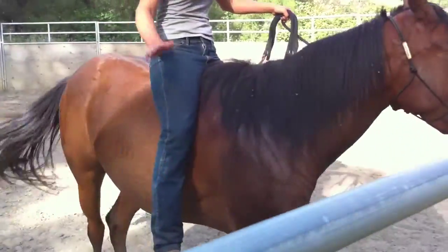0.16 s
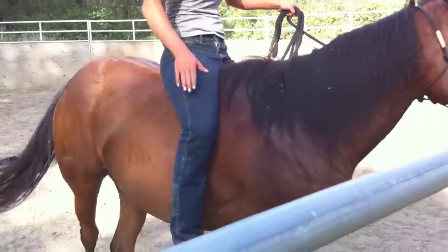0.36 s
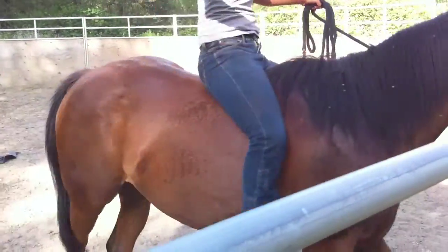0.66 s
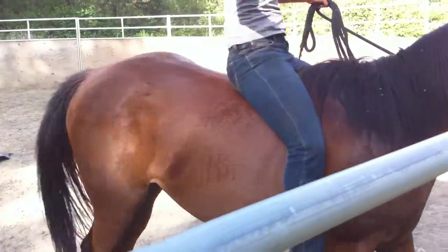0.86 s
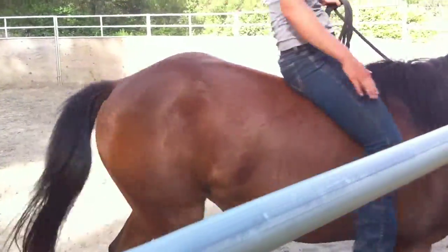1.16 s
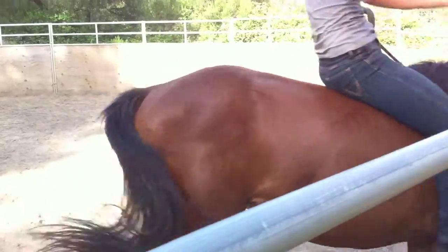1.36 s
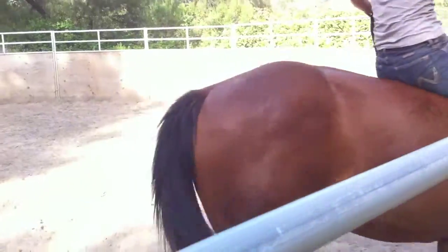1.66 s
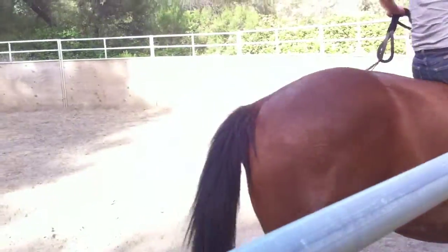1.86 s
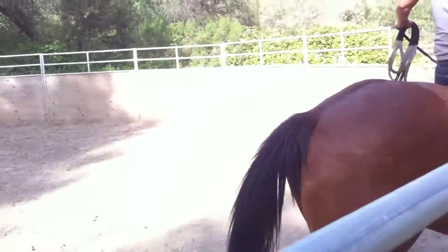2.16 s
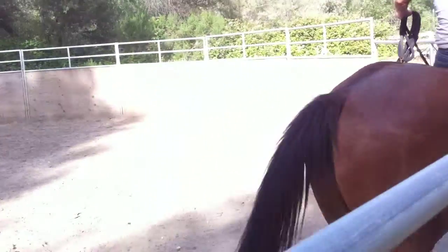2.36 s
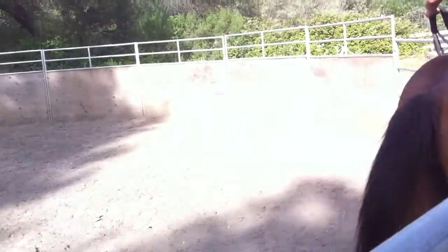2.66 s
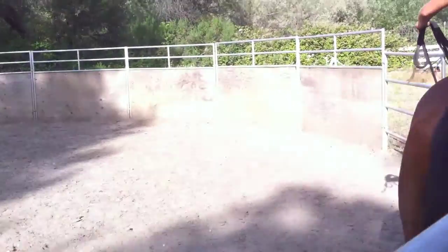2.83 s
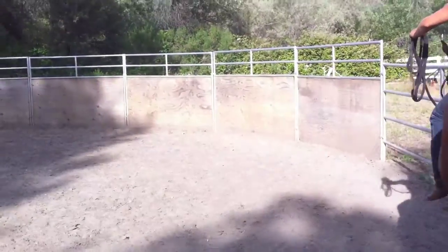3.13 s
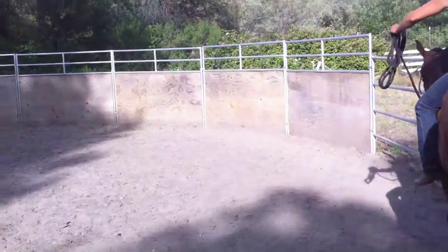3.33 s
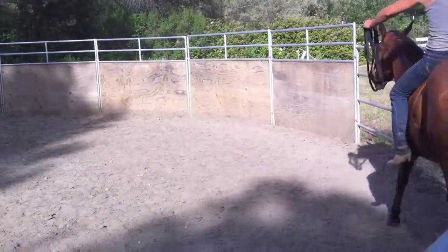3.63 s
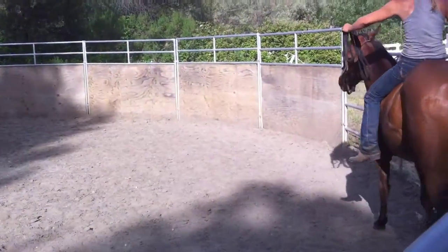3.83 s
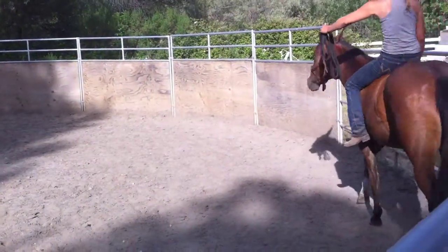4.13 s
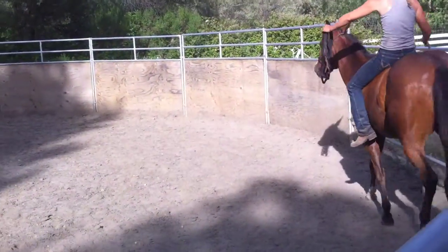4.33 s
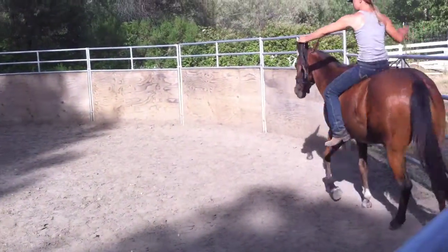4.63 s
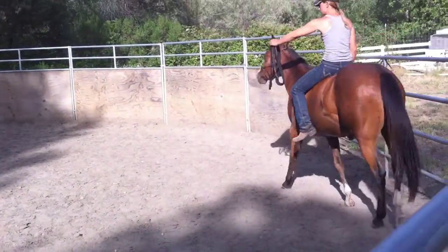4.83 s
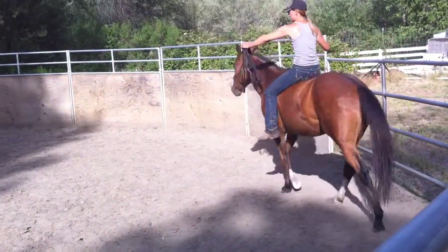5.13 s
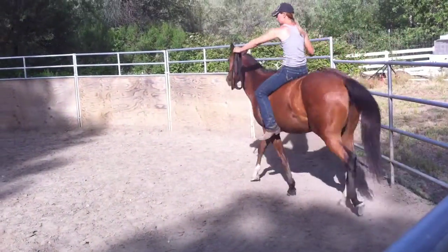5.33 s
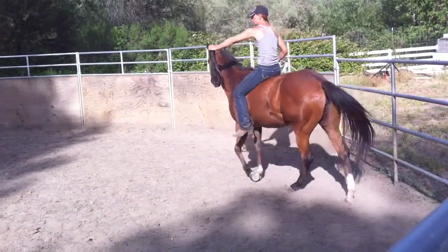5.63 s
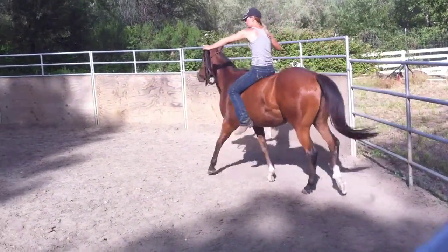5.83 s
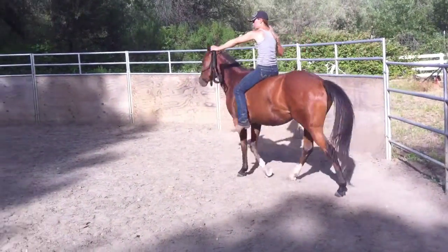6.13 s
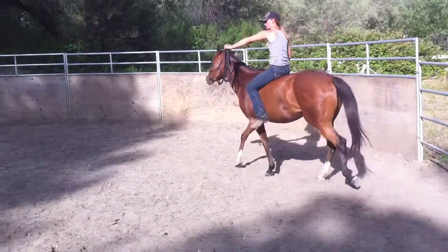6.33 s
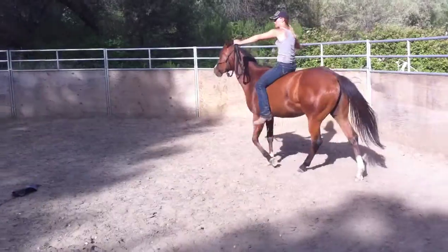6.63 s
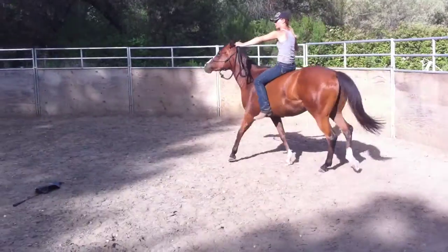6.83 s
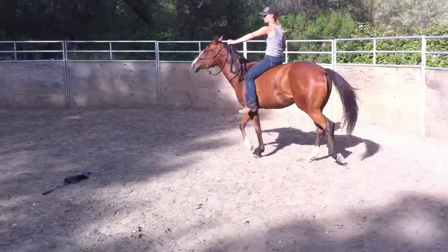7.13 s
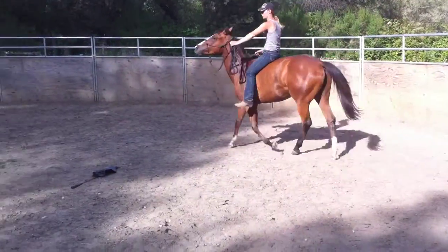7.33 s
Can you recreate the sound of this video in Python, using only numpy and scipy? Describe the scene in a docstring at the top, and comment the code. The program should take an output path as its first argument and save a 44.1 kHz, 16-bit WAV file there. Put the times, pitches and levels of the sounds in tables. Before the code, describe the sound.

Sharp hand slaps on denim and a horse's hide sound close by, mixed at first with quiet tongue clicks. They repeat steadily, ten in all, getting softer as the horse moves off across an open-air pen. Between them come dull hoof steps, crunching sand, ticks of grit and swishes of tail and cloth. Faint bird whistles and a low, throbbing far engine sit behind in a soft wash of air.

```python
"""Open-hand slaps on thigh and hide, with small tongue clicks, as a bareback rider urges a horse away
round a sandy pen. Each slap is a thump of flesh, a ring of trapped air and a crack of cloth.
Between the slaps the hooves thud and scuff in the sand, tail and denim swish and bits of grit tick.
Birds whistle faintly in the bushes, and a far engine drones and throbs, slowly growing."""
import sys
import numpy as np
from scipy import signal
from scipy.fft import rfft, irfft
from scipy.io import wavfile

SR = 44100
rng = np.random.default_rng(int(sys.argv[2]) if len(sys.argv) > 2 else 0)


def to_wav(sig):
    """Store sig (one row per channel, or 1-D mono) as 16-bit WAV at the path in sys.argv[1].

    Samples outside -1..1 are clipped; the rate is SR.
    """
    pcm = np.clip(np.atleast_2d(sig), -1, 1) * 32767
    pcm = np.round(pcm).astype(np.int16)
    wavfile.write(sys.argv[1], SR, pcm.T)  # frames by channels


N = 330309
TIME = np.arange(N) / SR
AGE = np.arange(int(.08 * SR)) / SR  # seconds into a one-shot

# open-hand slaps: t/s, thump/dB, clap/dB, crack/dB, flesh/Hz, palm pocket/Hz, its width/Hz,
# finger pocket/Hz, its share/dB, rub of the sliding hand/dB
SLAPS = [(0.366, -35, -20, -27, 397, 2180, 900, 4430, -2.5, -52),
         (1.1771, -31.5, -18.5, -33.5, 447, 1920, 800, 3350, -1.5, -53),
         (2.0214, -37, -17, -30, 315, 2410, 400, 1700, -10, -50.5),
         (2.9, -34.5, -29, -32.5, 294, 920, 830, 2660, 0.5, -50.5),
         (3.5942, -40, -29, -43.5, 326, 1390, 695, 1650, -7, -57),
         (4.2703, -39, -35.5, -45, 480, 1780, 845, 2330, -36, -54.5),
         (4.974, -52.5, -34, -43, 477, 2160, 1670, 1510, -14, -49.5),
         (5.6382, -42, -41, -65, 378, 790, 590, 1400, -7.5, -59.5),
         (6.441, -53, -42, -52.5, 417, 2220, 1300, 2900, -4.5, -61),
         (7.176, -49, -40, -58.5, 374, 1400, 910, 760, -1, -56.5)]
# hiss spectrum of hair and cloth: f/Hz, level/dB
HISS = [(2500, -75), (4500, -6.5), (7000, -0.5), (10000, -2.5), (15500, -5)]


def from_db(db):
    return 10 ** (np.asarray(db) / 20)


def rms_one(x):
    return x / np.sqrt(np.mean(x ** 2) + 1e-20)


def curve(points, s=TIME):
    """Read a breakpoint curve at the given times."""
    return np.interp(s, *np.transpose(points))


def add(track, s, sound):
    """Mix a sound in, starting at a time."""
    at = max(int(s * SR), 0)
    track[at:at + len(sound)] += sound[:N - at]


def band(x, low_hz, high_hz, order=2):
    sos = signal.butter(order, [low_hz, min(high_hz, .45 * SR)], "band", fs=SR, output="sos")
    return signal.sosfilt(sos, x)


def resonance(x, hz, width_hz):
    r = np.exp(-np.pi * width_hz / SR)
    feedback = [1, -2 * r * np.cos(2 * np.pi * hz / SR), r * r]
    return signal.lfilter(np.array([1, 0, -1]) * (1 - r * r) / 2, feedback, x)


def drift(per_s):
    """A random modulator gliding from value to value; rms 1."""
    return rms_one(np.interp(TIME * per_s, np.arange(N), rng.standard_normal(N)))


def coloured(x, spectrum):
    """EQ a steady noise to a spectrum, rolling off past its ends; rms 1."""
    hz, level_db = np.transpose(spectrum)
    log_hz = np.log(np.maximum(np.arange(N // 2 + 1) * SR / N, 1))
    gain = from_db(np.interp(log_hz, np.log(hz), level_db))
    skirts = np.exp(-2 * np.abs(log_hz - np.clip(log_hz, np.log(hz[0]), np.log(hz[-1]))))
    return rms_one(irfft(rfft(x) * gain * skirts, N))


def grains(per_s, spread_db):
    """Random clicks of uneven size; rms 1."""
    sizes = from_db(spread_db * np.minimum(rng.exponential(1, N), 4))
    return rms_one(sizes * rng.standard_normal(N) * (rng.random(N) < per_s / SR))


def at_level(x, level_db):
    """Scale a one-shot to a level, taken as if its energy lay within 10 ms."""
    return from_db(level_db) * x / np.sqrt(np.sum(x ** 2) / (.01 * SR) + 1e-20)


def burst(rise_s, decay_s):
    """Noise that swells and dies; energy 1."""
    x = rng.standard_normal(len(AGE)) * (1 - np.exp(-AGE / rise_s)) * np.exp(-AGE / decay_s)
    return x / np.linalg.norm(x)


def distance(s):
    """Metres from the listener to the horse."""
    # the horse walks away: t/s, distance/m
    path = [(0, 1.86), (2, 2.06), (4, 3.7), (7.49, 6.1)]
    return curve(path, s)


def air():
    """A bed of open air: the even wash of leaves and distance."""
    # level ride of the wash: t/s, level/dB
    ride = [(0.0, -64.5), (0.87, -67), (1.77, -63), (5.38, -63.5), (5.63, -63), (7.49, -64.5)]
    # its spectrum: f/Hz, level/dB
    spectrum = [(20, -17), (50, -12), (90, -3.5), (140, -7.5), (300, -2.5), (520, -7.5), (900, 1.5),
                (1200, -0.5), (2400, -8.5), (4200, -18.5), (6400, -15), (10000, -24.5), (13500, -15),
                (16000, -37)]
    return from_db(curve(ride) + 3.5) * coloured(rng.standard_normal(N), spectrum)


def engine(tone_db=-1.5, rumble_db=-0.7):
    """A far engine: wavering low partials in a rumble, throbbing and slowly sinking in pitch."""
    # engine speed: t/s, speed/ratio
    speed = [(0, 1.055), (2.4, 1.06), (5.6, 1.025), (7.49, .99)]
    # partials at a speed of 1: f/Hz, relative level/dB
    partials = [(65.8, -13), (105.7, -1), (145.3, 9), (170, -3.5), (212, -16.5)]
    # rumble spectrum: f/Hz, level/dB
    rumble_spectrum = [(75, -34), (110, -8), (160, -2.5), (210, -6.5), (300, -17.5)]
    # level ride of the drone: t/s, level/dB
    ride = [(0.0, -73), (0.58, -79.5), (2.4, -64.5), (3.5, -67), (3.69, -64), (5.11, -63.5), (5.38, -62),
            (6.74, -58), (7.49, -57.5)]
    phase_per_hz = 2 * np.pi * np.cumsum(curve(speed)) / SR
    tone = sum(from_db(db + 2 * drift(4.1)) * np.sin(hz * phase_per_hz + 0.2 * drift(3.2))
               for hz, db in partials)
    rumble = coloured(rng.standard_normal(N), rumble_spectrum)
    drone = from_db(tone_db) * rms_one(tone) + from_db(rumble_db) * rumble
    throb = 1 + .25 * np.sin(13 * phase_per_hz + .5 * drift(3))
    return from_db(curve(ride)) * throb * drone


def rustle(one_metre_db=-62):
    """Cloth and hair never rest: a thin uneven crackle that fades as the horse moves off."""
    gain = from_db(one_metre_db + 1.4 * drift(23)) / distance(TIME)
    return gain * coloured(grains(5000, spread_db=5.0), HISS)


def tongue_clicks(squeak_hz=2166, rasp_db=-1.5):
    """The tongue lets go with a short squeak, followed by a spatter of wet little pops."""
    # a run of clicks: t/s, level/dB
    clicks = [(0.068, -41.5), (0.374, -61), (0.663, -47), (0.951, -44.5), (1.239, -48.5), (1.548, -47),
              (1.830, -53.5)]
    out = np.zeros(N)
    for s, level_db in clicks:
        pitch_hz = squeak_hz * (1 + .03 * rng.standard_normal())
        squeak = np.sin(2 * np.pi * pitch_hz * AGE) * np.exp(-((AGE - .005) / 0.0024) ** 2)
        ring = resonance(burst(0.0028, 0.0043), 1.15 * pitch_hz, 1100)
        pops = burst(0.0044, 0.0084) * (rng.random(len(AGE)) < 2500 / SR)
        rasp = resonance(pops, 1.15 * pitch_hz, 430) + 0.086 * resonance(pops, 2 * pitch_hz, 1200)
        release = at_level(squeak, -6.5) + at_level(ring, -13.5) + from_db(4.5) * burst(.002, 0.0045)
        add(out, s, at_level(release, level_db))
        add(out, s + 0.0069, at_level(band(rasp, 1300, 5350), level_db + rasp_db))
    return out


def hooves(spray_db=-6):
    """Soft sand gives a dull thud, a crunch as it packs and a fine spray that follows the step's weight."""
    # hooves meeting the sand: t/s, thud/dB, crunch/dB (both before trim)
    steps = [(0.141, -52.5, -58), (0.256, -52, -56.5), (2.542, -46.5, -56.5), (2.768, -74, -47.5),
             (3, -51, -53.5), (3.161, -58, -55.5), (3.974, -41, -56), (4.092, -54, -59.5), (4.36, -72, -61),
             (5.058, -59, -61), (5.256, -50.5, -69), (5.757, -46, -54.5), (6.514, -50.5, -62),
             (7.057, -50, -67), (7.242, -50, -58.5)]
    out = np.zeros(N)
    for s, thud_db, crunch_db in steps:
        thud = at_level(band(burst(0.0037, 0.0033), 164, 396), thud_db - 1.5)
        crunch = at_level(band(burst(0.0023, 0.011), 920, 2130), crunch_db + 7.5)
        spray = band(burst(.002, 0.007), 4500, 18000, order=1)
        add(out, s - .002, thud + crunch + at_level(spray, max(thud_db, crunch_db) + spray_db))
    return out


def strokes(slide_after_s=0.087, slide_s=0.16, shuffles_per_s=4, shuffle_s=.05, spread_db=3):
    """Cues for all rubbing: broad scuffs, the hand sliding off after each slap, small random shuffles."""
    # scuffs of sand, tail hair and denim: middle t/s, length/s, rub/dB, hiss/dB (both before trim)
    broad = [(0.169, 0.1, -59, -55), (0.267, 0.1, -53.5, -51), (0.597, 0.085, -57.5, -70),
             (0.809, 0.13, -52.5, -68), (0.966, 0.02, -45.5, -50.5), (1.034, 0.06, -52, -58.5),
             (1.32, 0.051, -53, -52), (1.733, 0.033, -50.5, -54.5), (2.24, 0.086, -53, -51),
             (2.46, 0.068, -62, -47), (2.53, 0.14, -66, -60), (2.78, 0.049, -47, -50),
             (2.862, 0.036, -50.5, -58), (3.38, 0.44, -55.5, -60.5), (4.095, 0.035, -53, -57),
             (4.829, 0.061, -52.5, -61.5), (5.526, .032, -56.5, -65), (5.677, 0.027, -67, -61),
             (5.863, .05, -57, -60), (6.065, 0.016, -61, -53), (6.295, 0.075, -59, -54.5),
             (6.408, 0.052, -55, -58), (6.5, 0.12, -48.5, -82), (6.61, 0.11, -59, -81),
             (6.803, 0.03, -58, -63.5), (7.108, 0.067, -60, -64), (7.465, 0.046, -56, -64)]
    slides = [(s + slide_after_s, slide_s, rub_db, rub_db - 13) for s, *_, rub_db in SLAPS]
    chances = rng.random((int(shuffles_per_s * N / SR), 2))
    shuffles = [((k + late) / shuffles_per_s, shuffle_s, -58 - spread_db * soft, -65.5 - spread_db * soft)
                for k, (late, soft) in enumerate(chances)]
    return broad + slides + shuffles


def scuffs():
    """Sliding sand crunches in coarse grains, hair and cloth hiss in fine ones, stroke by stroke."""
    # spectrum of the coarse rub: f/Hz, level/dB
    rub_spectrum = [(150, 6.5), (350, 4), (1200, 5), (2600, 9), (5000, -4.5), (7000, -1.5), (11000, -56)]
    rub, hiss = np.zeros(N), np.zeros(N)
    for s, length_s, rub_db, hiss_db in strokes():
        near = slice(*np.searchsorted(TIME, [s - 2 * length_s, s + 2 * length_s]))
        off_centre = 2 * (TIME[near] - s) / length_s
        swell = 1 / (1 + (1.6 * off_centre) ** 4)
        rub[near] += from_db(rub_db - 3.0) * swell
        hiss[near] += from_db(hiss_db + 2.0) * swell
    coarse = coloured(grains(1800, spread_db=1.0), rub_spectrum)
    fine = coloured(grains(9000, spread_db=4.0), HISS)
    edges_hz = np.geomspace(2000, 19000, 6)
    flickering = sum(band(fine, low, high) * from_db(1.6 * drift(80))
                     for low, high in zip(edges_hz, edges_hz[1:]))
    return from_db(2.0 * drift(70)) * (rub * coarse + hiss * rms_one(flickering))


def ticks():
    """Small sharp ticks: grit in the sand and one faint, far tongue click."""
    # ticks: t/s, level/dB, f/Hz
    cues = [(0.2573, -45, 1970), (0.735, -43, 9200), (0.784, -50.5, 10100), (0.8163, -55.5, 5000),
            (2.419, -53.5, 10000), (2.5448, -53, 5300), (4.359, -54, 2600), (6.243, -53, 10900),
            (6.514, -43.5, 3840), (7.145, -57.5, 2900)]
    out = np.zeros(N)
    for s, level_db, pitch_hz in cues:
        add(out, s, at_level(band(burst(0.00051, 0.0028), .65 * pitch_hz, 1.5 * pitch_hz), level_db))
    return out


def slaps(fingers_lead_s=0.001445, scatter_per_m=.34, height_m=1.45, echo_db=-20, echo_db_per_m=2.5):
    """Palm and fingers each squeeze out a ringing pocket of air; flesh thumps and cloth cracks."""
    out = np.zeros(N)
    contact = signal.unit_impulse(len(AGE))
    for s, thump_db, clap_db, crack_db, flesh_hz, palm_hz, width_hz, finger_hz, finger_db, _ in SLAPS:
        metres = distance(s)
        scatter = scatter_per_m * (metres - 1)  # further off, more of the sound arrives scattered
        push = contact + scatter * burst(.0001, 0.0044)
        flesh = at_level(resonance(contact, flesh_hz, 0.45 * flesh_hz), 0)
        overtone = at_level(resonance(contact, 2.4 * flesh_hz, 0.893 * flesh_hz), -15.5)
        thump = at_level(band(flesh - overtone, 166, 910, order=4), thump_db)
        smack = at_level(band(burst(0.00019, 0.0026), 656, 1370), -12)  # the hide flutters on briefly
        palm = at_level(band(resonance(push, palm_hz, width_hz), 520, 1.23 * palm_hz), -0.23)
        pocket = resonance(push, finger_hz, .2 * finger_hz)
        fingers = at_level(resonance(pocket, finger_hz, .6 * finger_hz), finger_db)
        clap = at_level(smack + palm + fingers, clap_db)
        crack = band(0.68 * contact + scatter * burst(0.00032, 0.0048), 4360, 7640, order=3)
        snap = band(.5 * contact + burst(0.00026, 0.00075), 4900, 14100)
        hit = thump + clap + at_level(crack, crack_db + 0.5) + at_level(snap, crack_db - 7.0)
        fingertips = at_level(band(burst(0.00043, 0.00057), 1130, 2597), clap_db - 13)
        add(out, s - fingers_lead_s, fingertips)
        add(out, s, hit)
        # the ground echo closes in and gains with distance
        lag_s = (np.hypot(metres, 2 * height_m) - metres) / 343
        add(out, s + lag_s, from_db(echo_db + echo_db_per_m * metres) * hit)
    return out


def birds(flutter=0.0091, fade_s=0.0085):
    """Each whistle is a gliding sine, fluttering and smeared on its way through the leaves."""
    # slurs: t/s, length/s, level/dB, first f/Hz, last f/Hz, bend (over 1 the glide comes late)
    whistles = [(1.356, 0.17, -66, 3750, 2600, .8), (2.164, 0.13, -59, 2410, 2400, 1.1),
                (2.626, .03, -56, 3110, 2560, 0.82), (2.649, 0.074, -52.5, 2710, 2460, 1.8),
                (2.741, .085, -55, 3000, 2310, 0.88), (3.27, .06, -59, 2780, 3280, 1.7),
                (3.318, .06, -55, 2600, 2355, 0.63), (3.361, 0.16, -60, 3100, 2280, 0.45),
                (3.995, 0.093, -52.5, 3050, 2280, 1.24), (4.093, .09, -62, 3370, 3250, 0.76),
                (5.306, 0.11, -65, 3170, 2984, 0.92)]
    out = np.zeros(N)
    warble, flicker_db = 1 + flutter * drift(400), 2.0 * drift(110)
    for s, length_s, level_db, first_hz, last_hz, bend in whistles:
        sung = (TIME > s) & (TIME < s + length_s)
        along = (TIME[sung] - s) / length_s
        pitch_hz = first_hz + (last_hz - first_hz) * along ** bend
        swell = np.minimum(np.minimum(along, 1 - along) * length_s / fade_s, 1)
        phase = 2 * np.pi * np.cumsum(pitch_hz * warble[sung]) / SR
        out[sung] += swell * from_db(level_db + flicker_db[sung]) * np.sin(phase)
    smeared = signal.fftconvolve(out, burst(.002, .02))[:N]
    return .6 * out + .4 * smeared


def pen(x, wall_s=.098, wall_db=-35, tail_db=-31, tail_t60_s=0.11):
    """The ring wall returns a smeared echo, and the bushes a thin dull tail."""
    age = TIME[:SR // 2]
    tail = band(rng.standard_normal(len(age)), 295.5, 1700, order=1) * from_db(-60 * age / tail_t60_s)
    response = from_db(tail_db) * tail / np.linalg.norm(tail)
    add(response, wall_s, from_db(wall_db) * band(burst(.004, .012), 400, 5000, order=1))
    return x + signal.fftconvolve(x, response)[:N]


def scene():
    """Horse, rider and birds in the pen, over a bed of engine and open air; mono."""
    foley = slaps() + tongue_clicks() + rustle() + hooves() + scuffs() + ticks()
    return (pen(foley + birds()) + engine() + air())[None]


def record(dry, cutoff_hz=16000):
    """Soft saturation rounds the highest peaks, and a steep low-pass cuts the top."""
    rounded = 0.82 * np.tanh(dry / 0.92)
    return signal.sosfilt(signal.ellip(10, .1, 70, cutoff_hz, fs=SR, output="sos"), rounded)


dry = scene()
out = record(dry)
to_wav(out)
```